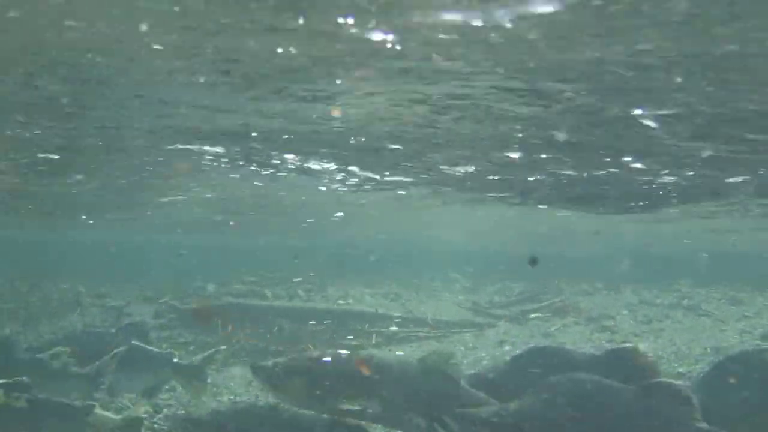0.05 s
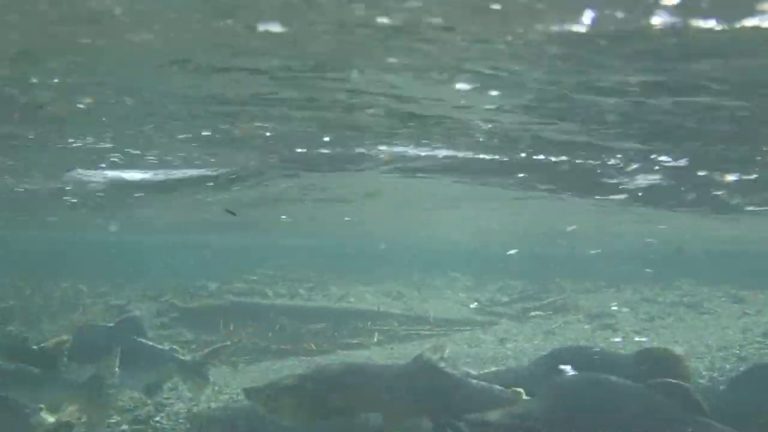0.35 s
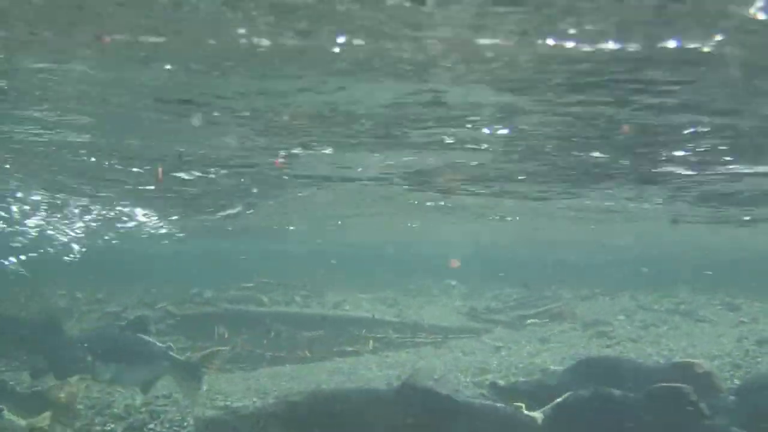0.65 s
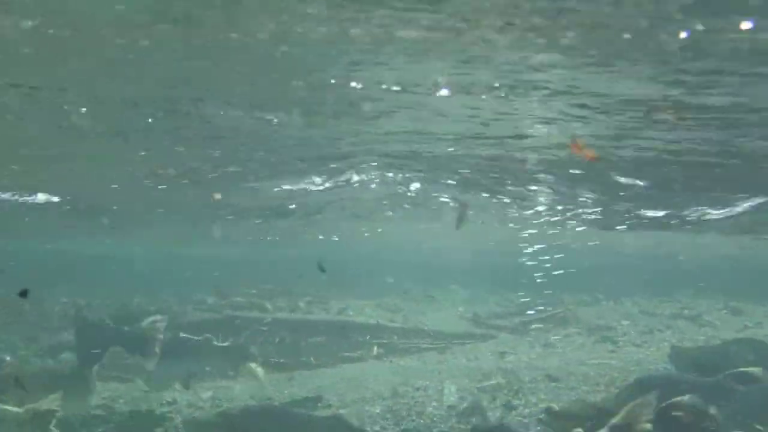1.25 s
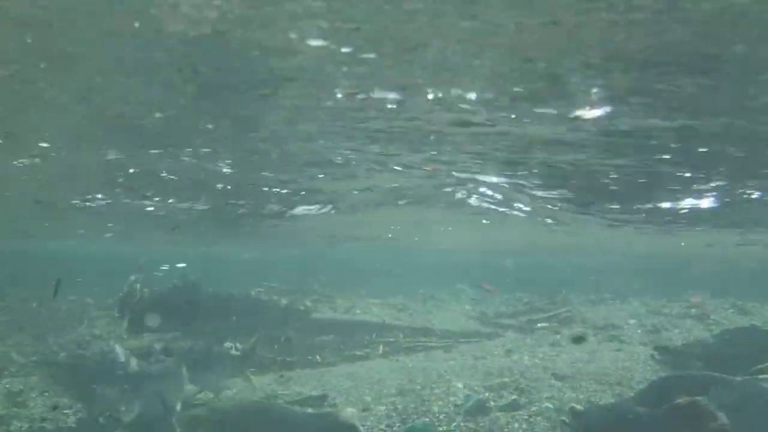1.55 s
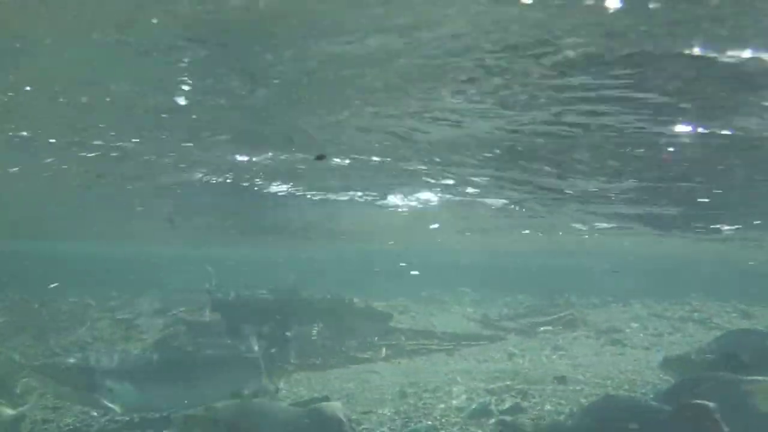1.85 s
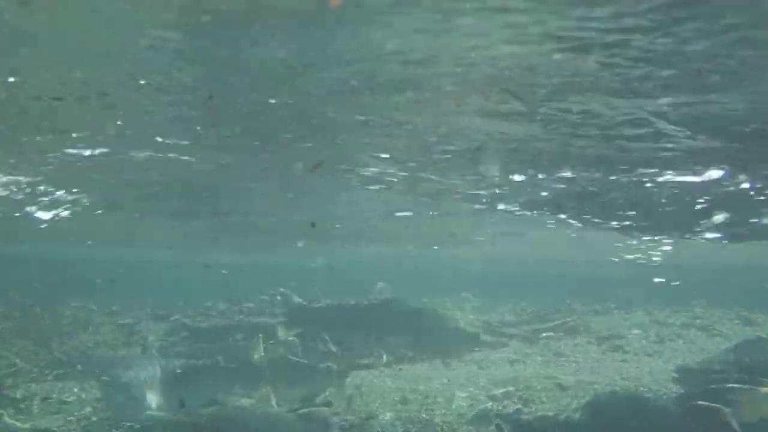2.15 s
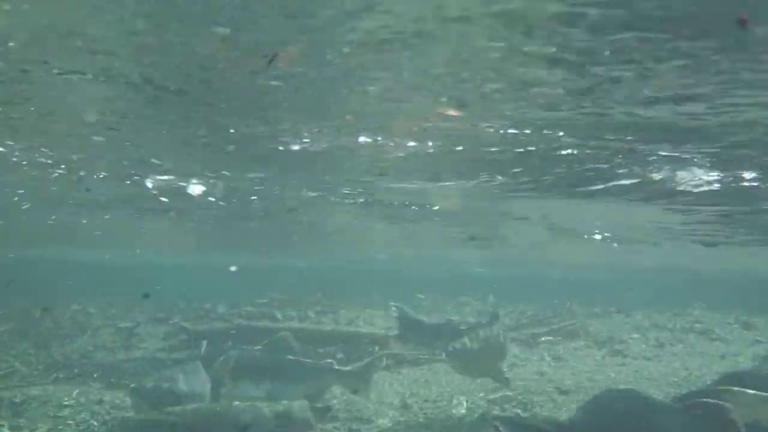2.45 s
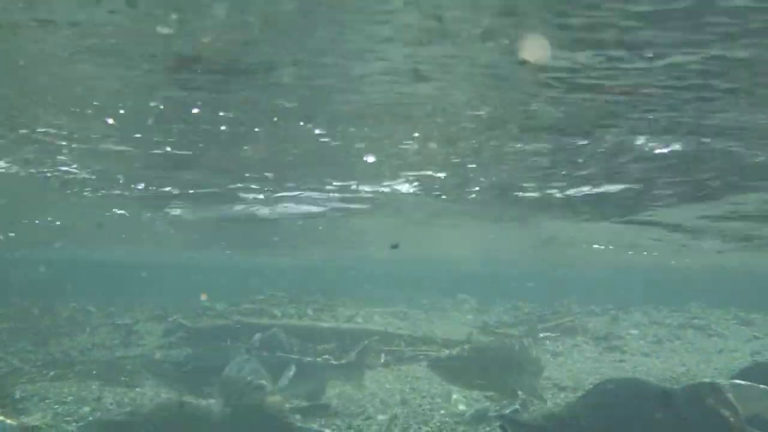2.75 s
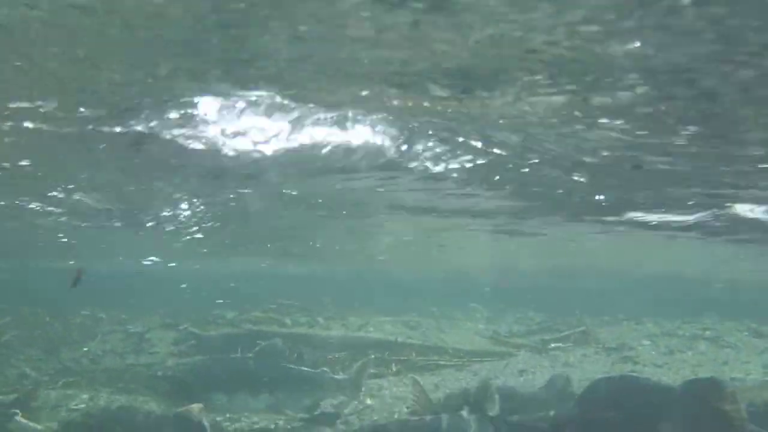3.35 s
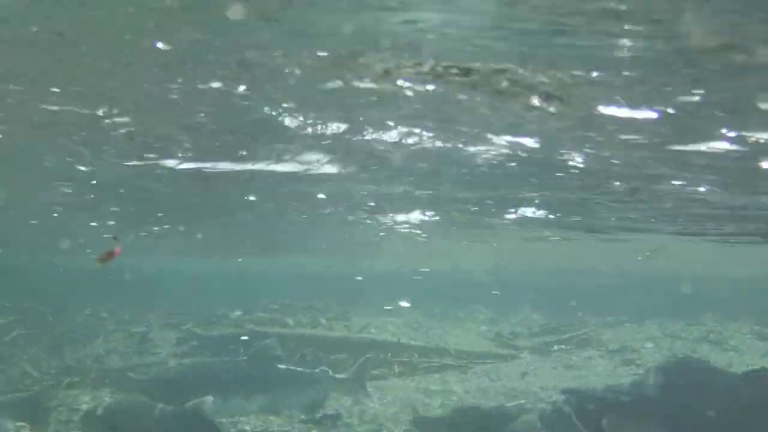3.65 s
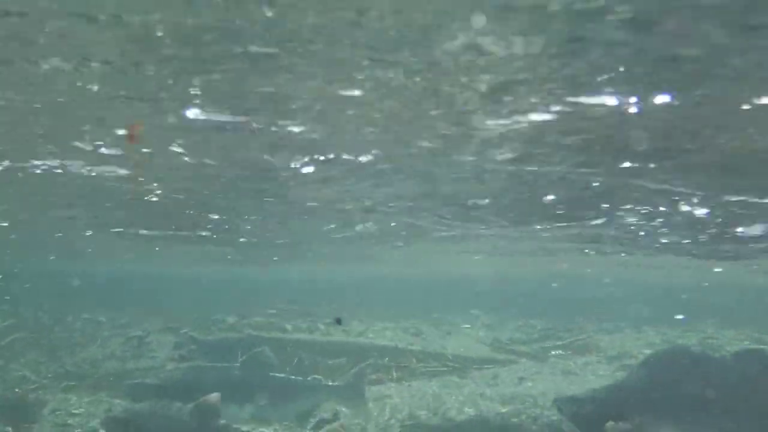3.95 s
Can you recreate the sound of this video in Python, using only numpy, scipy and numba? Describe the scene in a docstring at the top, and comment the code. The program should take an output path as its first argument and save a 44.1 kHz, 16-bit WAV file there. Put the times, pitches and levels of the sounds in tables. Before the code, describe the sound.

An underwater camera's mechanism ticks rapidly and hollowly, right at the microphone. Beneath it, a shallow flowing pond rumbles, small bubbles ring, grit clicks and soft bumps hit the housing. Late on, one hard knock lands on the left.

```python
"""An underwater camera's own mechanism ticks into its flooded microphone ports, 15 pairs of beats a second.
It sits among fish in a shallow, flowing pond: the water rumbles, small bubbles ring, grit clicks
and soft bumps land on the housing. One hard knock overloads the left port, briefly turns the volume
down and ends that port's extra ringing (probably trapped air shaken loose)."""
import sys
import numpy as np
from scipy import signal
from scipy.io import wavfile
from scipy.ndimage import uniform_filter1d
from numba import njit

SR = 44100
rng = np.random.default_rng(int(sys.argv[2]) if len(sys.argv) > 2 else 0)


def persist_wave(psi):
    """Save psi, clipped to +-1, as 16-bit WAV."""
    counts = np.round(np.clip(psi, -1, 1) * 32767).astype(np.int16)
    wavfile.write(sys.argv[1], SR, np.atleast_2d(counts).T)


N = 176400
T = np.arange(N) / SR
KNOCK_S = 2.9675

# How strongly the water stirs bubbles and grit: time_s, gurgle_db, crackle_db
WATER_ACTIVITY = [(0, -19, -4), (.25, -3, 6), (.4, 4, 10), (.48, 11, 4), (.56, 5, 12), (.68, 1.5, -9.5),
                  (.9, -4.5, -16), (1.4, -35, -3.5), (1.85, 4.5, 5), (2.2, -8, 9), (2.45, -4, 0.5),
                  (2.7, 6.5, 6), (2.93, -35, 6), (3.2, -6.5, 4), (3.45, -6, 1), (4, -9.5, -4)]


def amp(db):
    return 10 ** (np.asarray(db) / 20)


def unit_level(x):
    return x / np.sqrt(np.mean(x ** 2) + 1e-20)


def gain_over_time(table, column):
    """One dB column of a time table as a gain for each sample."""
    table = np.array(table)
    return amp(np.interp(T, table[:, 0], table[:, column]))


def db_at_pitch(table, hz, column):
    """One dB column of a pitch table at the given pitches."""
    table = np.array(table)
    return np.interp(np.log(hz + 1), np.log(table[:, 0]), table[:, column])


def add(mix, start_s, sound):
    part = mix[..., max(round(start_s * SR), 0):][..., :sound.shape[-1]]
    part += sound[..., :part.shape[-1]]


def pan(x, pan_db):
    """Make stereo by turning the far side down; positive pan_db is to the left."""
    return amp([[min(pan_db, 0)], [-max(pan_db, 0)]]) * x


def colour(x, table, column=1, size=8192):
    """Filter a sound by a pitch table, so that it rings after each hit and never before."""
    hz = abs(np.fft.fftfreq(size, 1 / SR))
    log_gain = np.log(amp(db_at_pitch(table, hz, column)))
    ring = np.fft.ifft(np.exp(np.conj(signal.hilbert(log_gain)))).real[:size // 2]
    return signal.fftconvolve(x, ring)[:len(x)]


def sprinkle(per_s, spread_db):
    """Randomly timed kicks, mostly small and a few large."""
    size = np.minimum(rng.exponential(1, N), 4)
    return amp(spread_db * size) * (rng.random(N) < per_s / SR) * rng.choice([-1, 1], N)


def water_flow(likeness=0.7, patch_db=1.2, swell_db=0.5):
    """Moving water rumbles and washes in drifting patches, much alike on both sides."""
    # Tone of the flow: pitch_hz, left_db, right_db
    tone = [(17, -58, -62), (29, -31, -30), (47.7, -16.5, -16), (108, -24.5, -24.5), (247, -22, -20),
            (425, -19, -15), (700, -25.5, -16.5), (1024, -31, -34.5), (1510, -35.5, -39),
            (2080, -42.5, -52.5), (3264, -47, -44.5), (3550, -58, -60), (4050, -69, -70), (4630, -46, -75),
            (6250, -62, -53), (9200, -66.5, -64.5), (16000, -73, -67)]
    left, other = rng.standard_normal((2, N))
    right = likeness * left + np.sqrt(1 - likeness ** 2) * other
    hz, _, spectrum = signal.stft([left, right], SR, nperseg=1024, noverlap=768)
    patches = uniform_filter1d(rng.standard_normal(spectrum.shape[1:]), size=8, axis=0)
    patches = unit_level(uniform_filter1d(patches, size=6, axis=1))
    swell = unit_level(uniform_filter1d(rng.standard_normal(spectrum.shape[2]), size=25))
    steady_db = np.array([db_at_pitch(tone, hz, side) for side in (1, 2)])[..., None]
    gain = amp(steady_db + patch_db * patches + swell_db * swell)
    return signal.istft(spectrum * gain, nperseg=1024, noverlap=768)[1][:, :N]


def mechanism(beat_s=1 / 29.97, first_s=0.0461, offbeat_late_s=0.00096, jitter_s=0.0001):
    """Two beats take turns; each is a few pushes that ring the housing, with a little rasp."""
    # Strength of the beats: time_s, main_beat_db, off_beat_db
    effort = [(0, -8.5, -5), (.66, -9, -3.5), (.71, -1, -6), (1.7, -1.5, -6), (2.9, -2.5, -10.5),
              (3.25, 1, -3.5), (4, -1.5, -3)]
    # The start, stop and rebounds within a beat: delay_s, main_beat_db, off_beat_db
    pushes = [(0, -3, -6.5), (.00305, 0, -1), (.0043, -10.5, -19), (.0061, -18.5, -9), (.0090, -23, -18),
              (.0135, -31, -11.5), (.0205, -16.5, -6.5), (.0265, -17.5, -15)]
    # How the housing rings at the ports: pitch_hz, left_db, right_db
    housing = [(40, -12, 3), (156, 1.5, -14.5), (397, 2.5, 15), (575, 6, 13.5), (604, 25, 24),
               (676.6, 25.5, 28.5), (787, 28, 27.5), (870, 13.5, 16.5), (1009, 6.5, 5.5), (1310, -4, -10),
               (1960, -26.5, -17.5), (3160, -27.5, -16), (3950, -43, -33.5), (6000, -31, -24),
               (16000, -57.5, -49)]
    # Tone of the rasp as the mechanism starts to move: pitch_hz, level_db
    rasp_tone = [(300, -1.5), (1000, 5), (1500, 2), (2100, -4), (3150, 1), (3700, -17), (5000, -22.5),
                 (16000, -29)]
    whirr_db, push_db, spread_db, rasp_db = -39, 2, 0.28, -32.5
    rasp_lead_s, rasp_fade_s, right_lag_s = 0.0011, 0.0038, 0.0001
    force, rasp_starts = amp(whirr_db) * rng.standard_normal(N), np.zeros(N)
    strength = gain_over_time(effort, 1), gain_over_time(effort, 2)
    wobbles = rng.standard_normal((int(N / SR / beat_s), 2))
    for beat, (late, loud) in enumerate(wobbles, -1):
        offbeat = beat % 2
        start_s = first_s + beat * beat_s + offbeat * offbeat_late_s + jitter_s * late
        size = strength[offbeat][[min(int(start_s * SR), N - 1)]] * amp(spread_db * loud)
        add(rasp_starts, start_s - rasp_lead_s, size)
        for delay_s, *beat_db in pushes:
            add(force, start_s + delay_s, size * amp(push_db + beat_db[offbeat]))
    rasp_fades = signal.lfilter([1], [1, -np.exp(-1 / (rasp_fade_s * SR))], rasp_starts)
    rasp = amp(rasp_db) * rasp_fades * rng.standard_normal(N)
    left = colour(force, housing, column=1)
    right = np.interp(T - right_lag_s, T, colour(force, housing, column=2))
    return np.array([left, right]) + colour(rasp, rasp_tone)


def trapped_air(left):
    """Until the knock, the left port has an extra ring, probably from air caught in it."""
    # The extra ring: pitch_hz, boost_db
    ring = [(300, 1), (680, -3.5), (800, 0), (900, 10.5), (980, 17.5), (1100, 17), (1350, 8), (2000, 0.5),
            (4000, 4)]
    return np.where(T < KNOCK_S, colour(left, ring), left)


def grain_click(hz, fade_s=0.0015):
    """One grain of grit makes a very short, noisy ring."""
    t = T[:SR // 50]
    return np.exp(-t / fade_s) * (np.sin(2 * np.pi * hz * t) + rng.standard_normal((2, len(t))))


def grit(crackle_per_s=150, crackle_db=-49.5, low_hz=4600, high_hz=6800, pitches=12):
    """Grains of gravel tick clearly over a fine crackle."""
    # The clear ticks: start_s, level_db, pitch_hz, pan_db
    ticks = [(.120, -45, 7040, 5), (.232, -34, 5030, 19), (.290, -38, 6200, 13), (.331, -49, 5050, 12),
             (.377, -32, 5240, 18), (0.393, -32.5, 5100, 16), (0.457, -32, 4900, 23),
             (0.553, -38, 5400, 19), (.632, -40, 5100, 12), (0.768, -37, 4740, 12), (1.033, -30, 7340, 4),
             (1.168, -28, 4870, 21), (1.438, -38, 6840, 6), (1.667, -32, 5300, 17),
             (1.779, -30.5, 4500, 21), (1.844, -32, 4480, 19), (2.035, -36, 5000, 26),
             (2.070, -27, 4840, 23), (2.159, -36, 4600, 22), (2.259, -33.5, 6560, 8),
             (2.393, -28, 4500, 20), (2.492, -29.5, 6350, 7), (2.600, -34.5, 5160, 17),
             (2.645, -35, 5100, 17), (2.672, -38, 4900, 12), (2.7, -24, 4800, 27), (2.745, -41, 5440, 12),
             (2.908, -36, 5200, 14), (2.937, -30, 5000, 20), (3.077, -40, 5400, 10),
             (3.225, -35.5, 5700, 7), (3.379, -22, 5300, 13), (3.871, -35, 5250, 15)]
    # Tone of all the grit: pitch_hz, level_db
    tone = [(500, -15), (2000, -13), (3100, -16), (3600, -21), (4150, -11), (4700, -1), (7300, -8.5),
            (9000, -19), (16000, -30)]
    tick_boost_db, drag_db, drag_s = 6.5, -13.5, 0.018
    crackle = np.zeros((2, N))
    for hz in np.geomspace(low_hz, high_hz, pitches):
        hits = sprinkle(crackle_per_s / pitches, spread_db=4)
        crackle += signal.oaconvolve(hits[None], grain_click(hz), axes=1)[:, :N]
    out = pan(crackle, pan_db=17.5) * amp(crackle_db) * gain_over_time(WATER_ACTIVITY, 2)
    for start_s, level_db, hz, pan_db in ticks:
        size = amp(level_db + tick_boost_db)
        add(out, start_s, pan(size * grain_click(hz), pan_db))
        for late in rng.random(size=3):  # each grain drags weaker ones after it
            add(out, start_s + drag_s * late, pan(size * amp(drag_db) * grain_click(hz), pan_db))
    return np.array([colour(side, tone) for side in out])


def bubble(hz, rise_s, glide_per_s=-2.1):
    """One bubble starts ringing softly and slides a little down in pitch."""
    t = T[:SR // 16]
    swell = (t / rise_s) ** 2 * np.exp(2 - 2 * t / rise_s)
    return swell * np.sin(2 * np.pi * hz * t * (1 + glide_per_s * t / 2))


def bubble_swarm(per_s, low_hz, high_hz, rise_s, pitches=20):
    """Many small bubbles ring at random; the higher ones are weaker."""
    out = np.zeros(N)
    for hz in np.geomspace(low_hz, high_hz, pitches):
        starts = sprinkle(per_s / pitches, spread_db=2.5)
        out += signal.oaconvolve(starts, bubble(hz, rise_s))[:N] * (low_hz / hz) ** 2
    return out


def bubbles(gurgle_db=-34, fizz_db=-49):
    """Clear bubbles ring over a gurgle and fizz of small ones, nearer the left port."""
    # The clear bubbles: start_s, pitch_hz, level_db
    singles = [(.130, 1390, -31), (0.257, 1477, -24.5), (0.277, 2810, -34.5), (0.338, 1137, -17),
               (0.35, 1450, -23.5), (0.428, 1550, -26), (0.458, 1476, -18.5), (0.469, 1610, -24),
               (0.482, 1037, -12), (0.5, 1420, -25), (0.499, 1028, -13), (.512, 1020, -21),
               (.559, 2900, -40), (0.763, 2700, -35), (.766, 1128, -12.5), (.822, 1090, -21),
               (0.936, 1194, -21), (1.007, 1610, -26), (1.091, 1350, -25.5), (1.776, 1660, -27),
               (1.791, 1890, -36), (1.842, 1288, -12.5), (1.861, 1210, -13), (2.033, 1300, -19.5),
               (2.374, 1536, -25), (2.404, 1134, -20), (2.463, 1140, -17.5), (2.525, 1380, -25),
               (2.540, 1084, -6), (2.802, 1105, -14), (2.945, 1074, -7.5)]
    activity = gain_over_time(WATER_ACTIVITY, 1)
    gurgle = amp(gurgle_db) * activity * bubble_swarm(per_s=350, low_hz=1000, high_hz=1712, rise_s=0.0037)
    fizz = amp(fizz_db) * activity * bubble_swarm(per_s=130, low_hz=2240, high_hz=3340, rise_s=0.0012)
    for start_s, hz, level_db in singles:
        add(gurgle, start_s, amp(level_db) * bubble(hz, rise_s=0.0054))
    return pan(gurgle, pan_db=20.5) + pan(fizz, pan_db=5)


def bumps(sag=0.636, sag_s=0.0064, rise_s=0.00051, fade_cycles=0.71, click_s=0.00017):
    """Soft bumps shake the housing for a cycle or two that sag in pitch, some with a click."""
    # Bumps on the housing: start_s, level_db, starting_pitch_hz, pan_db, click_db
    hits = [(0.149, -4, 270, 6.5, -60), (.153, -9.5, 120, 6, -60), (.182, -15, 197, 8, -60),
            (0.57, -14, 260, -4, -48), (.595, -18.5, 92, -2, -60), (.612, -38, 70, 5, -60),
            (0.8893, -4, 320, 5, -13), (.946, -9, 450, 0, -45), (0.957, -15, 148, 3.5, -60),
            (1.011, -12.5, 193, -5, -50), (1.06, -14, 264, 2.5, -50), (1.094, -8, 306, -1.5, -50),
            (1.1, -13, 130, 7, -60), (1.115, -18.5, 135, 2, -60), (1.255, -24, 55.4, -5, -62),
            (1.777, -31, 302, 8, -8), (2.715, -6.5, 310, 3.5, -37), (2.779, 3, 327, 15, -7),
            (3.094, -1.5, 445, -3, -67), (3.103, -9.5, 94.5, 3, -46), (3.156, -13.5, 133, 3, -63),
            (3.157, -2.5, 530, 1, -61), (3.256, -20, 65, 2, -65), (3.347, -9.5, 325, -2.5, -50),
            (3.361, -11.5, 91, -2, -66), (3.376, -4.5, 184, 13, -55), (3.401, -1, 252, 8, -53)]
    # Tone of a click on the housing: pitch_hz, level_db
    click_tone = [(300, 12), (1500, 12), (3200, -0.5), (4000, -14.5), (5000, -10), (8000, -22),
                  (16000, -39)]
    out, t = np.zeros((2, N)), T[:SR // 8]
    for start_s, level_db, hz, pan_db, click_db in hits:
        pitch_hz = hz * (1 - sag * (1 - np.exp(-t / sag_s)))
        cycles = np.cumsum(pitch_hz) / SR
        swell = (1 - np.exp(-t / rise_s)) * np.exp(-cycles / fade_cycles)
        thud = amp(level_db) * swell * np.sin(2 * np.pi * cycles)
        click = amp(click_db) * colour(np.exp(-t / click_s) * rng.standard_normal(len(t)), click_tone)
        add(out, start_s, pan(thud + click, pan_db))
    return out


def knock(push_s=0.0073, push_db=-3.5, crack_s=0.0045, crack_db=-12):
    """A hard knock at the left port: a push of water, then a crack and a hollow ring."""
    # Notes of the knocked port: pitch_hz, level_db, fade_s (to fall 60 dB), rise_s, pan_db
    notes = [(294, 5.5, 0.22, 0.0069, 42), (564, 19.5, 0.036, 0.0033, 42), (655, 31, 0.051, 0.035, 51),
             (920, 14.5, 0.027, 0.0024, 21), (1615, 3.5, 0.037, 0.0019, 7)]
    out, t = np.zeros((2, N)), T[:SR // 3]
    push = -amp(push_db) * np.sin(np.pi * np.minimum(t / push_s, 1) ** 2)
    add(out, KNOCK_S - push_s, pan(push, pan_db=30))
    dull_noise = unit_level(uniform_filter1d(rng.standard_normal(len(t)), size=4))
    crack = amp(crack_db) * np.exp(-t / crack_s) * dull_noise
    add(out, KNOCK_S, pan(crack, pan_db=22.5))
    for hz, level_db, fade_s, rise_s, pan_db in notes:
        swell = (1 - np.exp(-t / rise_s)) * amp(level_db - 60 * t / fade_s)
        add(out, KNOCK_S, pan(swell * np.sin(2 * np.pi * hz * t), pan_db))
    return out


def scene(hiss_db=-56.5):
    """All the sounds at the two ports, over a faint hiss."""
    left, right = mechanism() + water_flow()
    background = np.array([trapped_air(left), right])
    return background + bubbles() + grit() + bumps() + knock() + amp(hiss_db) * rng.standard_normal((2, N))


@njit
def limiter_cut_db(peak, limit, attack_s, recover_s, hold_s):
    """How far to turn the volume down after a loud peak: quick to act and slow to let go."""
    out, held, cut_db = np.zeros(len(peak)), 0., 0.
    for i in range(len(peak)):
        held = max(peak[i], held * (1 - 1 / (hold_s * SR)))
        over_db = 20 * np.log10(max(held / limit, 1.))
        cut_db += (over_db - cut_db) / (attack_s * SR) if over_db > cut_db else -cut_db / (recover_s * SR)
        out[i] = cut_db
    return out


def record(dry, low_cut_hz=36, high_cut_hz=15900, limit_db=-7.5, ceiling_db=-6.7):
    """The camera trims deep bass, turns down after loud blows, clips what gets past and trims the top."""
    peak = abs(dry).max(0)
    cut_db = limiter_cut_db(peak, float(amp(limit_db)), attack_s=0.0034, recover_s=0.15, hold_s=0.075)
    low_cut = signal.butter(2, low_cut_hz, "high", fs=SR, output="sos")
    limited = signal.sosfilt(low_cut, dry) * amp(-cut_db)
    clipped = limited / (1 + (limited / amp(ceiling_db)) ** 8) ** (1 / 8)
    high_cut = signal.firwin(511, high_cut_hz, window=("kaiser", 9), fs=SR)
    return signal.oaconvolve(clipped, high_cut[None], "same")


dry = scene()
out = record(dry)
persist_wave(out)
```